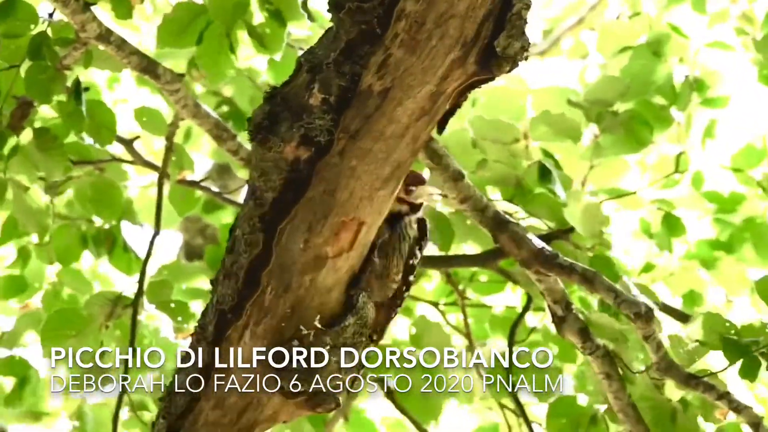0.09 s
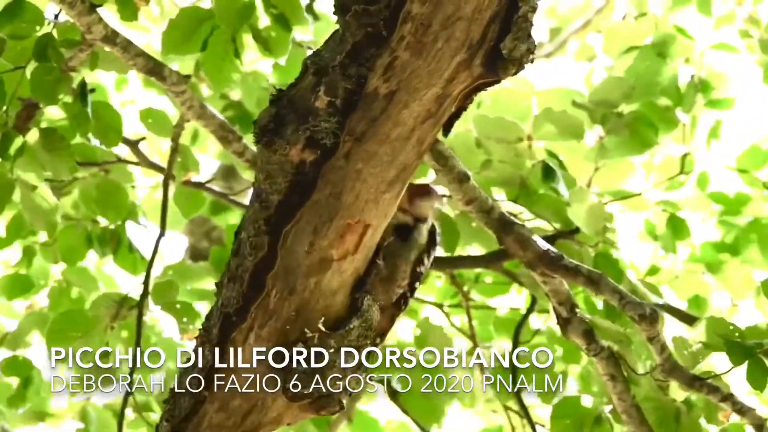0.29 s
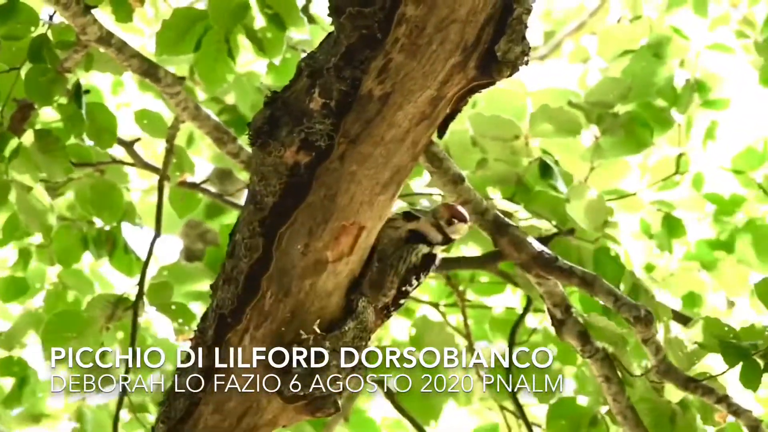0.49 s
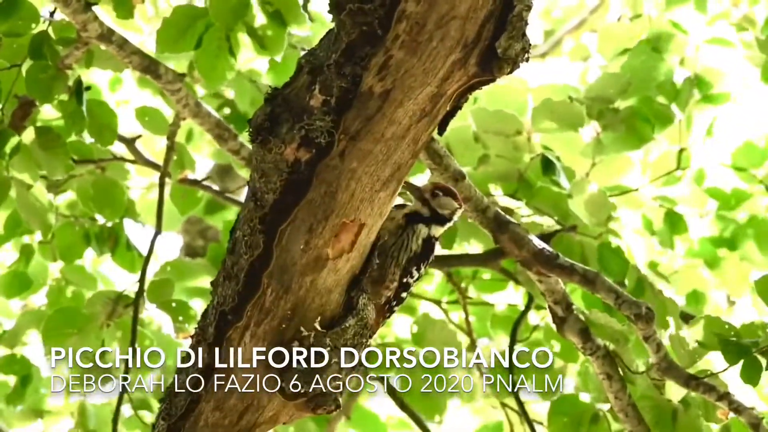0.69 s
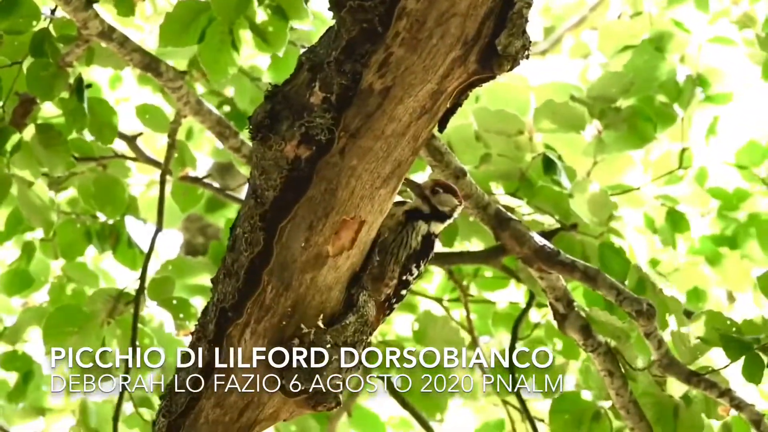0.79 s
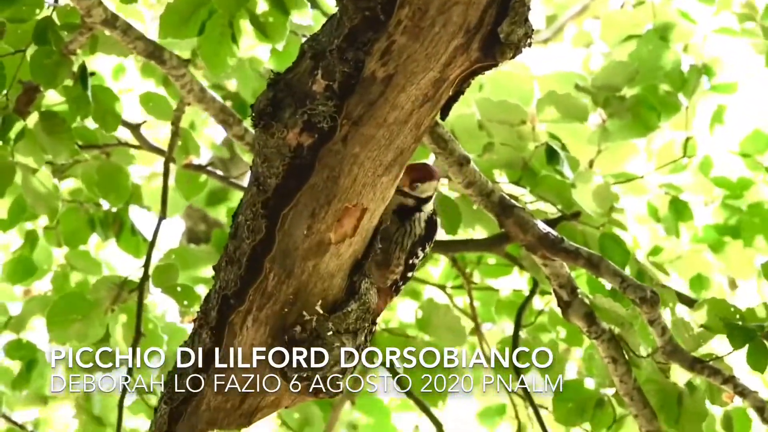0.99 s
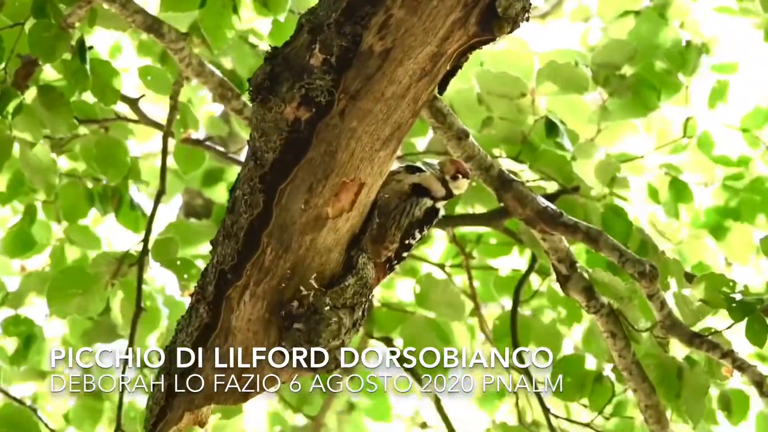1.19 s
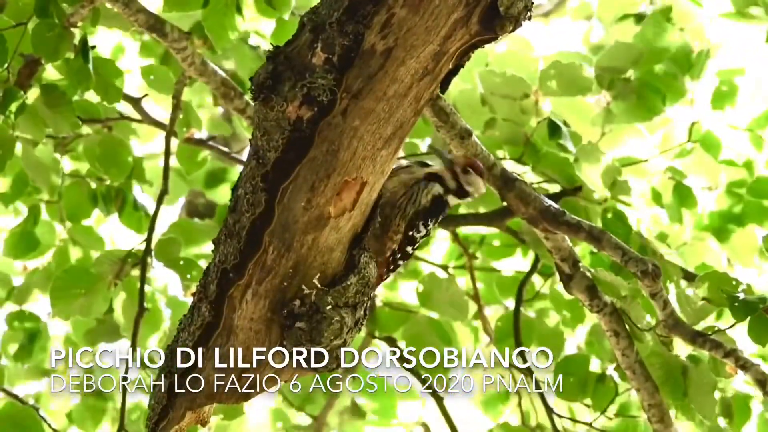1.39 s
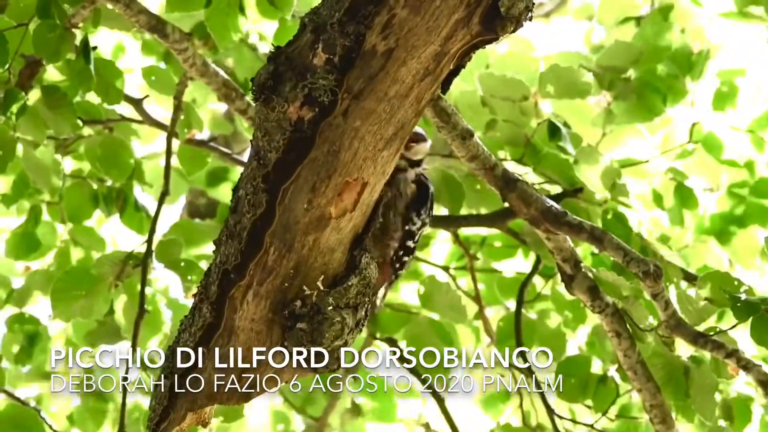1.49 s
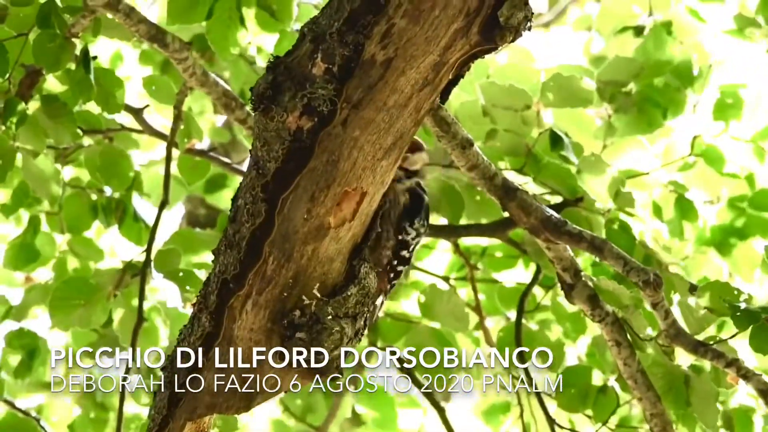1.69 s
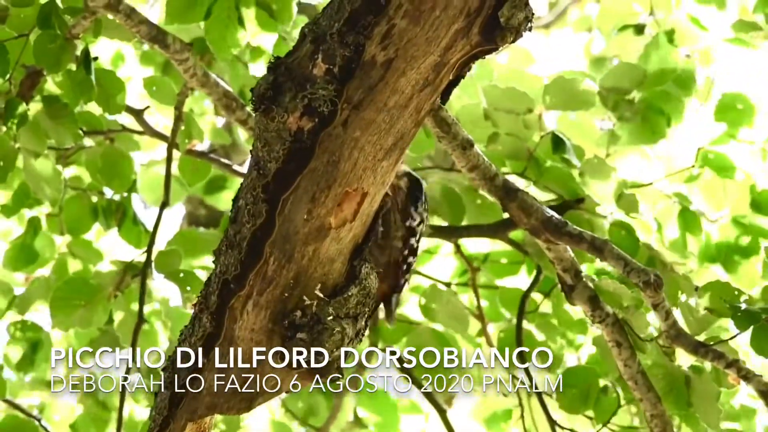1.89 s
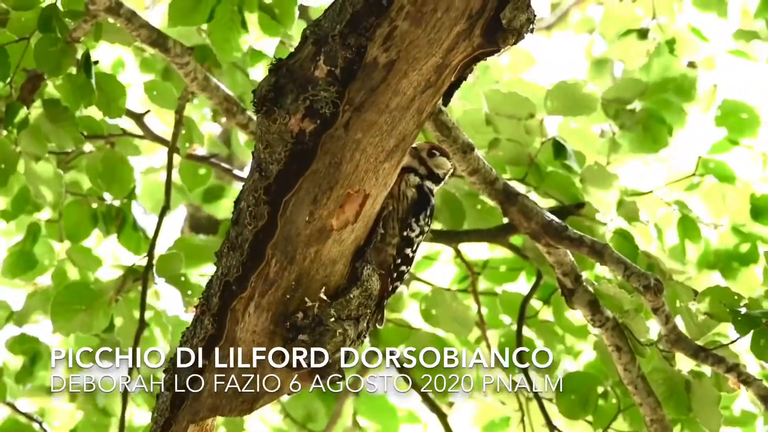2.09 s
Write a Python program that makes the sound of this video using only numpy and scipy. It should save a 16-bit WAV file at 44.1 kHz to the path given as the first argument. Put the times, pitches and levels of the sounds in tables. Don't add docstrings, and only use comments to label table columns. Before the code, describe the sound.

A woodpecker raps hard bark close to the right microphone: one loud crack after a tiny scrape, a weaker cluster a second in, then five faint hoarse chips echoing among leaves, with low wind buffets.

```python
import sys
import numpy as np
from scipy import signal
from scipy.fft import rfft, irfft, next_fast_len
from scipy.io import wavfile
from scipy.ndimage import map_coordinates

SR = 44100
rng = np.random.default_rng(int(sys.argv[2]) if len(sys.argv) > 2 else 0)


def invert_db(level):
    return 10 ** (np.asarray(level, dtype=float) / 20)


def store_wav(level_fs):
    pcm = np.round(np.clip(np.atleast_2d(level_fs), -1, 1) * 32767)
    wavfile.write(sys.argv[1], SR, pcm.T.astype(np.int16))


N = 94815


def unit(x):
    return x / np.sqrt(np.mean(x ** 2) + 1e-20)


def along(points, hz):
    f, v = np.transpose(points)
    return np.interp(np.log(hz + 1), np.log(f + 1), v)


def curves(rows):
    s, *cols = np.transpose(rows)
    return [np.interp(np.arange(N) / SR, s, c) for c in cols]


def wobble(rate):
    return map_coordinates(rng.standard_normal(1500), [np.arange(N) * rate / SR])


def filtered(x, response):
    m = next_fast_len(N + SR // 2)
    return irfft(rfft(x, m) * response(np.fft.rfftfreq(m, 1 / SR)), m)[..., :N]


def add(out, s, x):
    part = out[..., max(round(s * SR), 0):][..., :x.shape[-1]]
    part += x[..., :part.shape[-1]]


def ring(t, hz, t60, rise, sag=0):
    sag_s = 0.00025
    bent_t = t + sag * sag_s * (1 - np.exp(-t / sag_s))
    attack = (1 - np.exp(-2 * t / rise)) ** 2
    return invert_db(-60 * t / t60) * attack * np.sin(2 * np.pi * hz * bent_t)


def rush(spectrum, alike):
    def turn(hz):
        return np.arccos(np.clip(along(alike, hz), -1, 1)) / 2

    def weights(hz):
        return invert_db(along(spectrum, hz)) * [np.cos(turn(hz)), np.sin(turn(hz))]

    mid, side = filtered(rng.standard_normal((2, N)), weights)
    return unit(np.array([mid + side, mid - side]))


def taps():
    tap_s = [.2459, .2492, .25185, 1.0215, 1.0508, 1.0614, 1.10365]
    tap_spot = [0, 0, 0, 1, 1, 1, 2]
    # level/dB, bright modes/dB, hollow modes/dB, rise t/s
    blows = [
        (-20.5, 5.5, -34, 0.00024),
        (-31.5, -13, -24.5, 0.0008),
        (-5.5, 6.5, -30, 0.00035),
        (-43.5, 0, -14, 0.00097),
        (-32.5, -8, -55, 0.0004),
        (-18.5, 2, 1.5, 0.0013),
        (-14, -0.5, -1, 0.00054),
    ]
    # f/Hz, right level/dB, left level/dB, t60/s
    hard = [(810, -3.5, -8.5, 0.0052), (1620, 1.5, -4, 0.021), (2120, 0, -30, .06),
            (2520, -6.5, -36.5, 0.007), (2960, -9, -36.5, 0.0064), (3780, -6, -25, 0.013),
            (4492, -2.5, -13, 0.0088), (4930, -13.5, -22, 0.0059), (5550, -5, -19.5, 0.0074),
            (5860, 2.5, -13, 0.0049), (6900, -10, -39.5, .003), (8640, -33.5, -35, 0.00645),
            (10230, -27, -30.5, .005)]
    # f/Hz, right level/dB, left level/dB, t60/s
    flake = [(1140, -23, -42, 0.016), (2120, 0, -36, .035), (2480, 0.5, -27, 0.0094),
             (3400, -11, -31, 0.0091), (4700, -26, -22, .008), (5950, -11.5, -26, .01),
             (8130, -25, -19, 0.01), (11000, -36, -27, .006)]
    # f/Hz, right level/dB, left level/dB, t60/s
    hole = [(1170, -6.5, -19.5, 0.018), (1860, -8.5, -32, 0.0077), (2010, 2.5, -38, 0.011),
            (2400, -18, -32, 0.0054), (3080, -14, -28, .004), (3900, -1.5, -15, 0.0037),
            (5240, -32, -14.5, 0.007), (6380, -11, -25, 0.0056), (9070, -40, -22, 0.0077)]
    sags = (0.42, 0.13, 0.12)
    spot_crack_db = (2.5, -11.5, -12.5)
    crack_db = np.array((-16.5, -27.5))[::-1, None]
    crack_t60, bright_hz, hollow_hz = 0.0119, 2300, 1800
    left_lag_s = 0.00036
    scatter_db, detune = 0.8, 0.0032
    dull_hz = 12700

    out, t = thuds(), np.arange(SR // 10) / SR
    choke = np.exp(-(t / 0.0042) ** 3)
    for s, spot, (db, bright_db, hollow_db, rise) in zip(tap_s, tap_spot, blows):
        burst_db = bright_db + spot_crack_db[spot] + crack_db - 60 * t / crack_t60
        blow = invert_db(burst_db) * rng.standard_normal((2, len(t)))
        for hz, right_db, left_db, t60 in (hard, flake, hole)[spot]:
            tone_db = bright_db * (hz > bright_hz) + hollow_db * (hz < hollow_hz)
            tone_db += rng.normal(0, scatter_db)
            sag = sags[spot] * (hollow_hz < hz < bright_hz)
            mode = ring(t, hz * (1 + detune * rng.normal()), t60, rise, sag)
            if hz > hollow_hz:
                mode = mode * choke
            blow = blow + invert_db(tone_db + np.array([[left_db], [right_db]])) * mode
        add(out[0], s + left_lag_s, invert_db(db) * blow[0])
        add(out[1], s, -invert_db(db) * blow[1])
    return filtered(out, lambda f: 1 / (1 + (f / dull_hz) ** 6))


def thuds():
    thud_s = [.252, 1.0625, 1.0622, 1.104, 1.415]
    # level/dB, f/Hz, t60/s
    bodies = [
        (-36.5, 326, 0.02),
        (-33.5, 250, 0.025),
        (-43.5, 582, 0.036),
        (-47, 215, 0.17),
        (-54, 256, 0.071),
    ]
    out, t = np.zeros((2, N)), np.arange(SR // 10) / SR
    for s, (db, hz, t60) in zip(thud_s, bodies):
        add(out, s, -invert_db(db) * ring(t, hz, t60, 0.00061)[None])
    return out


def scrape():
    # t/s, level/dB, bright part/dB
    course = [(.13, -75, -5), (.17, -66, 6.5), (.215, -56, 5.5), (.24, -46.5, 9), (.251, -42, 18.5),
              (.256, -42.5, -8), (.27, -54.5, -19), (.31, -70, -17), (.4, -77.5, -8), (1.0, -76.5, -12.5),
              (1.056, -74.5, 16.5), (1.0615, -44.5, 9), (1.068, -64, 4), (1.12, -72, -8), (1.2, -77, -18)]
    # f/Hz, width f/Hz, level/dB
    grit = [(2136, 800, 6.5), (4360, 1600, -7.5), (10800, 2130, -18)]
    slip_rate = 1200
    level_db, bright_db = curves(course)
    slips = rng.standard_normal((2, N)) * (0.5 + 3 * (rng.random(N) < slip_rate / SR))
    bands = []
    for centre, width, db in grit:
        def resonance(f):
            return (1j * f * width / (centre * centre - f * f + 1j * f * width)) ** 2
        bands.append(invert_db(db) * unit(filtered(slips, resonance)))
    dull = invert_db(np.array([[-24], [0]])) * bands[0]
    bright = invert_db(bright_db + np.array([[-8], [0]])) * sum(bands[1:])
    return invert_db(level_db) * (dull + bright)


def knocks():
    # t/s, level/dB, upper modes/dB
    hits = [
        (0.0719, -44.5, 1),
        (0.0827, -48.5, -3.5),
        (1.4862, -56.5, 6.5),
        (1.683, -47, -6),
        (1.855, -59, 7),
    ]
    # f/Hz, level/dB, t60/s
    trunk = [(487, 1.5, 0.018), (856, -2, 0.019), (1260, 3.5, 0.018), (2110, -1.5, 0.018), (2720, -8, 0.01),
             (3720, -13.5, .012)]
    puff_db, puff_hz, puff_t60 = 4, 900, 0.03
    detune = 0.02
    out, puffs, t = np.zeros(N), np.zeros(N), np.arange(SR // 8) / SR
    for s, db, upper_db in hits:
        for k, (hz, level, t60) in enumerate(trunk):
            mode_db = db + level + upper_db * (k > 0) + rng.normal(0, 1)
            add(out, s, invert_db(mode_db) * ring(t, hz * (1 + detune * rng.normal()), t60, 0.0022))
        add(puffs, s, invert_db(db + puff_db - 60 * t / puff_t60) * rng.standard_normal(len(t)))
    return out + filtered(puffs, lambda f: (2j * f * puff_hz / (puff_hz + 1j * f) ** 2) ** 2)


def chips():
    # t/s, length t/s, level/dB, top f/Hz, second voice/dB
    calls = [
        (1.4106, 0.0269, -43.5, 2690, -10),
        (1.5775, 0.024, -42.5, 2635, -9.5),
        (1.709, 0.027, -42.5, 2699, -6.5),
        (1.9017, .025, -42.5, 2607, -5.5),
        (2.0157, 0.027, -45, 2560, -10),
    ]
    arch = [(0, .84), (.27, .99), (.4, 1), (.5, .96), (.7, .81), (1, .62)]
    # share of chip, level/dB
    swell = [(0, -14), (.27, -5.5), (.45, 0.5), (.6, -7), (.8, -13), (1, -15)]
    # share of chip, share of top pitch, level/dB
    second = [(0, 2.45, 6), (.14, 2.66, 3), (.3, 2.3, -6), (.6, 2.2, -7), (1, 1.95, -2)]
    overtones_db = (-17.5, 0.5, -25)
    hoarse_db, hoarse_rad, hoarse_rate = 3.5, 1.6, 500
    out, (share, bend, lift_db) = np.zeros(N), np.transpose(second)
    shake, sway = hoarse_rad * wobble(hoarse_rate), hoarse_rad * wobble(hoarse_rate)
    flutter = invert_db(hoarse_db * wobble(hoarse_rate))
    for s, length, db, top_hz, second_db in calls:
        u = np.linspace(0, 1, round(length * SR))
        now = slice(round(s * SR), round(s * SR) + len(u))
        phase = 2 * np.pi * np.cumsum(top_hz * np.interp(u, *np.transpose(arch))) / SR
        phase += shake[now] * u ** 0.5 / 2
        fall = 2 * np.pi * np.cumsum(top_hz * np.interp(u, share, bend)) / SR + sway[now] * u ** 0.5
        note = sum(invert_db(level) * np.sin((k + 1) * phase) for k, level in enumerate(overtones_db))
        note = note + invert_db(second_db + np.interp(u, share, lift_db)) * flutter[now] * np.sin(fall)
        loudness = invert_db(db + 4.0 + np.interp(u, *np.transpose(swell)))
        add(out, s, loudness * flutter[now] ** u * np.sin(np.pi * u) ** 0.5 * note)
    return out


def canopy(x):
    # delay t/s, level/dB
    echoes = [(.004, -10), (.009, -8), (.035, -14), (.047, -26.5), (.105, -20.5)]
    # f/Hz, t60/s
    decay = [(500, 0.26), (4000, 0.413), (5500, 0.73), (9000, 0.47)]
    tail_db, twigs_db, twigs_t60 = -2.5, -4, 0.045
    hz, t, z = signal.stft(rng.standard_normal((2, SR // 2)), SR, nperseg=256)
    tail = signal.istft(z * invert_db(-60 * t / along(decay, hz)[:, None]), SR, nperseg=256)[1]
    twigs = rng.standard_normal(tail.shape) * invert_db(-60 * np.arange(tail.shape[1]) / SR / twigs_t60)
    tail = invert_db(tail_db) * tail / np.linalg.norm(tail[0])
    tail = tail + invert_db(twigs_db) * twigs / np.linalg.norm(twigs[0])
    for delay, db in echoes:
        tail[:, round(delay * SR) + rng.integers(0, 40, size=2)] += invert_db(db) * np.eye(2)
    return signal.fftconvolve(x[None], tail, axes=1)[:, :N]


def rustled(x):
    shake_rad, shake_rate = 1.5, 420
    shake = shake_rad * np.array([wobble(shake_rate), wobble(shake_rate)])
    return np.real(signal.hilbert(x) * np.exp(1j * shake))


def twitter():
    # t/s, length t/s, start f/Hz, end f/Hz, level/dB
    whistles = [
        (0, .02, 7000, 6400, -63),
        (.047, .013, 6100, 5250, -64),
        (.093, .023, 3200, 5000, -67),
        (.13, .03, 3300, 4000, -68),
        (.212, .015, 3000, 3950, -64),
        (.77, .025, 2500, 2700, -67),
        (1.2, .14, 4700, 4500, -72),
    ]
    out, blur = np.zeros(N), 1.3 * wobble(300)
    for s, length, from_hz, to_hz, db in whistles:
        u = np.linspace(0, 1, round(length * SR))
        phase = 2 * np.pi * np.cumsum(from_hz + (to_hz - from_hz) * u) / SR
        phase += blur[round(s * SR):][:len(u)]
        add(out, s, invert_db(db) * np.sin(np.pi * u) ** 0.5 * np.sin(phase))
    return out


def buffets():
    # centre t/s, length t/s, level/dB, f/Hz, left over right/dB
    eddies = [
        (0.187, 0.039, -48, 90, -12),
        (0.701, 0.032, -50.5, 90, -3),
        (.968, 0.028, -43, 80.2, -8),
        (1.233, 0.038, -42, 55, -18),
        (1.428, .04, -42.5, 68.7, -19),
    ]
    out = np.zeros((2, N))
    for s, length, db, hz, left_db in eddies:
        t = np.arange(round(length * SR)) / SR
        push = np.sin(np.pi * t / length) ** 2 * np.sin(2 * np.pi * hz * t)
        add(out, s - length / 2, invert_db(db + np.array([[left_db], [0]])) * push)
    return out


def wind():
    # t/s, strength/dB, left over right/dB
    gusts = [(0.0, -56.5, -14), (0.23, -53.5, -28), (0.26, -44.5, -9), (0.34, -61.5, -11), (0.41, -49, -24),
             (0.45, -60.5, -8.5), (0.85, -59.5, 17), (0.87, -51.5, 22), (0.93, -64.5, -4),
             (1.05, -47.5, -15.5), (1.16, -62.5, -8), (1.22, -54.5, -17.5), (1.54, -64, -29),
             (1.8, -65.5, 22), (1.87, -54.5, -16), (2.02, -56.5, -1), (2.05, -65, -2), (2.15, -50, -19)]
    # f/Hz, level per Hz/dB
    rumble = [(15, -7), (30, 0.5), (70, 4.5), (120, -4), (220, -15.5), (400, -30), (900, -57)]
    lump_db, lump_rate = 1.5, 16
    strength_db, lean_db = curves(gusts)
    lumps = invert_db(lump_db * np.array([wobble(lump_rate), wobble(lump_rate)]))
    sides = 2 * np.array([invert_db(lean_db), np.ones(N)]) / np.sqrt(1 + invert_db(2 * lean_db))
    return invert_db(strength_db) * sides * unit(lumps * rush(rumble, [(50, 0.063)]))


def floor():
    # f/Hz, level per Hz/dB
    leaves = [(60, 1), (230, -0.5), (500, -3.5), (1000, -7.5), (2200, -12.5), (4500, -13.5), (7000, -13.5),
              (7500, -48.5)]
    # f/Hz, left-right likeness
    likeness = [(130, 0.18), (290, 0.37), (640, 0.24), (1400, 0.033)]
    # f/Hz, level per Hz/dB
    thin = [(7200, -42), (7950, -5), (8300, 0.5), (9200, -8), (9600, -43), (10100, -2), (15500, -3),
            (16500, -31)]
    rustle = invert_db(-60 + 0.506 * wobble(1.7)) * rush(leaves, likeness)
    return rustle + invert_db(-74.5) * rush(thin, [(50, 0.01)])


def scene():
    left_lag_s, left_db = 0.00021, -3.5
    bird, far = chips(), knocks() + twitter()
    direct = np.array([np.roll(bird, round(left_lag_s * SR)), bird])
    placed = (direct + rustled(canopy(bird))) * invert_db(np.array([[left_db / 2], [-left_db / 2]]))
    distant = far + invert_db(-1.5) * canopy(far)
    return taps() + scrape() + placed + distant + buffets() + wind() + floor()


def band_limit(x):
    return signal.sosfilt(signal.butter(12, 16440, fs=SR, output="sos"), x)


def record(dry):
    notch_hz, notch_wide_hz, notch_db, top_hz = 7723, 250, -33.5, 16100
    duck_s, duck_hold_s, duck_db, duck_hz = 0.2575, 0.012, -30, 6200

    def band(hz):
        return invert_db(notch_db * np.exp(-((hz - notch_hz) / notch_wide_hz) ** 4)) * (hz < top_hz)

    wet = filtered(dry, band)
    into_hold = 2 * (np.arange(N) / SR - duck_s) / duck_hold_s - 1
    duck = invert_db(duck_db * np.exp(-into_hold ** 8))
    treble = filtered(wet, lambda hz: 1 / (1 + (duck_hz / (hz + 1)) ** 16))
    wet = wet - (1 - duck) * treble
    return band_limit(np.clip(wet, -1, 1))


dry = scene()
out = record(dry)
store_wav(out)
```